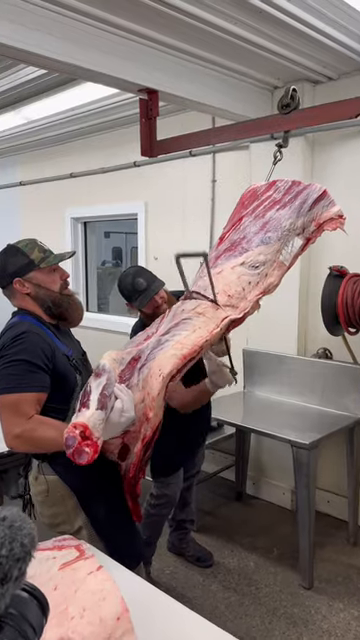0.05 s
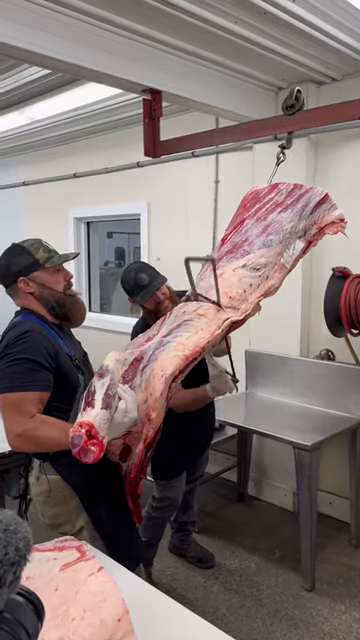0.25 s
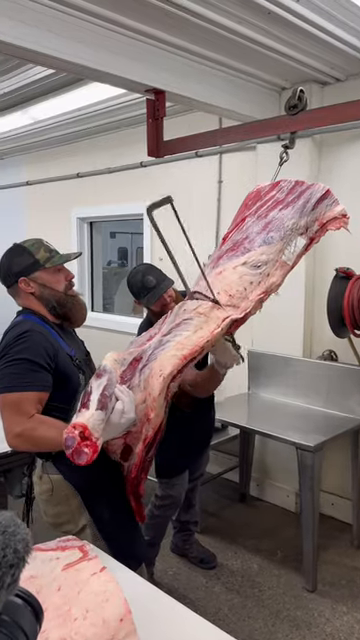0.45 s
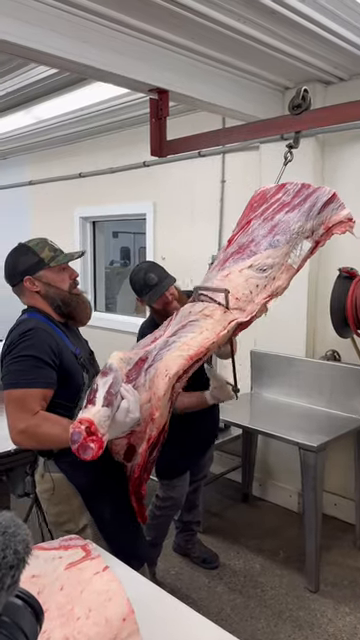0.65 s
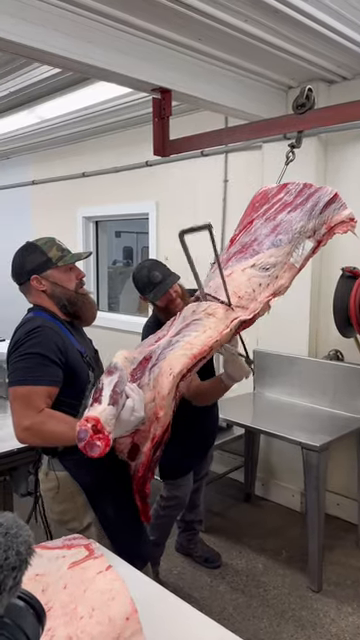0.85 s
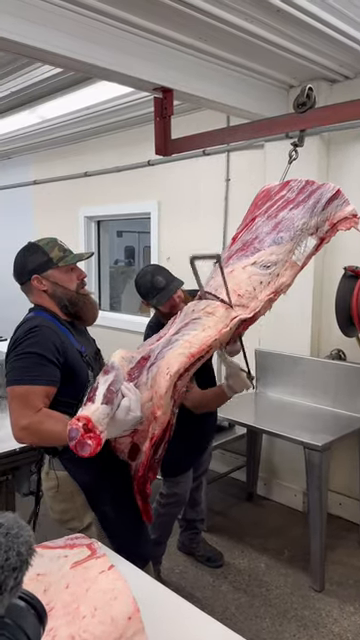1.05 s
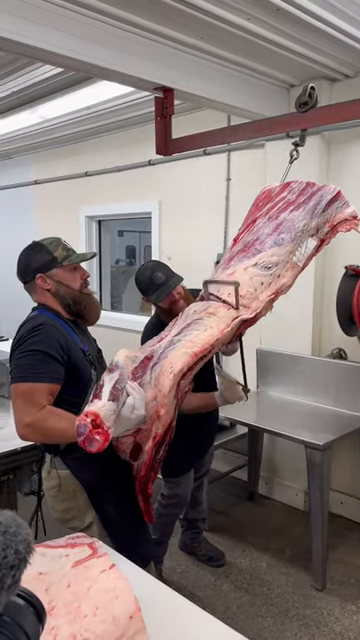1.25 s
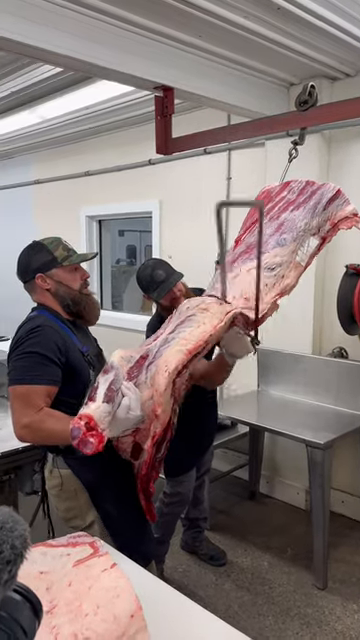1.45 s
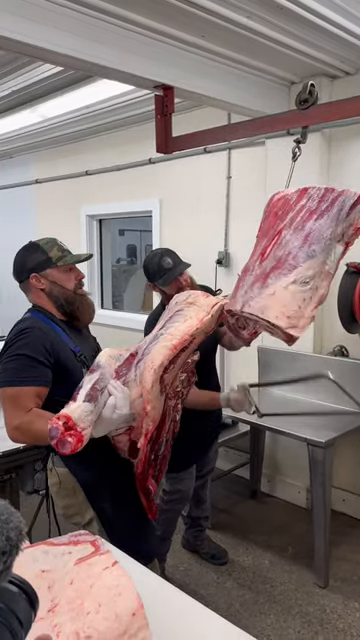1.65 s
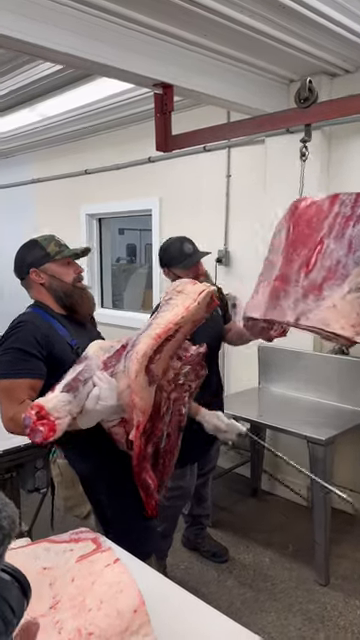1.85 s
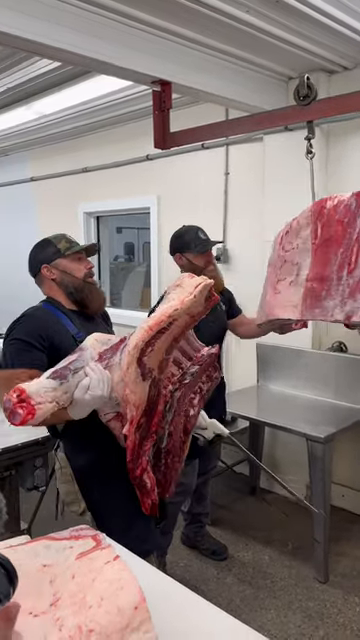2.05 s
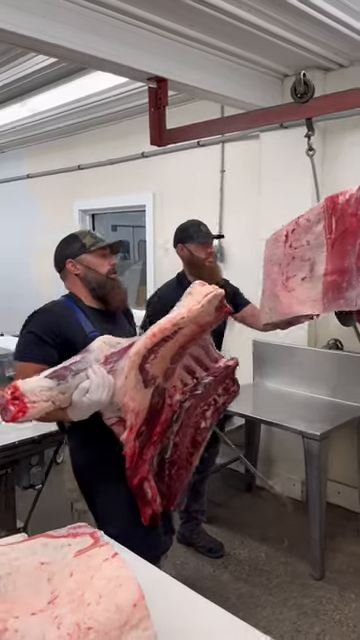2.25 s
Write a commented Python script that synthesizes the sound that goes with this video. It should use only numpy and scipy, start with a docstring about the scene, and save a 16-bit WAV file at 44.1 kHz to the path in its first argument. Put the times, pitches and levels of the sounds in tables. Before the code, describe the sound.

Nearby, a butcher's hand saw makes three loud, gritty cuts through a side of beef, each after a lighter return stroke. A muffled crack and faint thuds follow, while cooling machinery hums in the echoing room.

```python
"""A butcher's hand saw cuts through a hanging side of beef in a hard-walled room; a cooling plant rumbles.
Three times a light return stroke leads into a loud cut: tooth impacts and bone chips excite the steel
frame, stick-slip friction makes the blade squeal, and a hollow resonance falls as the arm slows.
At about 1.5 s the last of the bone snaps, and the halves are carried off with dull knocks."""
import sys
import numpy as np
from scipy import signal
from scipy.fft import rfft, irfft
from scipy.io import wavfile

SR = 44100
rng = np.random.default_rng(int(sys.argv[2]) if len(sys.argv) > 2 else 0)


def transcribe(u):
    """Save the signal u as a 16-bit wav file named by the first command-line argument.

    u: samples, shape (n,) or (channels, n), limited to [-1, 1]; the rate is SR.
    q: integer samples, one column per channel.
    """
    v = np.clip(np.atleast_2d(u).T, -1, 1)
    q = np.round(v * 32767).astype(np.int16)
    wavfile.write(sys.argv[1], SR, q)


N = 101429
FFT_SIZE = 2 ** 17
T, HZ = np.arange(N) / SR, np.fft.rfftfreq(FFT_SIZE, 1 / SR)

# force on the teeth, one curve per stroke (time [s], level [dB])
CUT_FORCES = [
    [(.19, -42.5), (.208, -33.5), (.272, -36.5), (.298, -25.5), (.322, -27.5), (.35, -24), (.378, -25),
     (.41, -35), (.45, -41)],
    [(.7, -49.5), (.735, -35.5), (.78, -32.5), (.825, -26), (.865, -26), (.892, -23.5), (.92, -30),
     (.96, -50)],
    [(1.22, -37.5), (1.25, -30), (1.275, -21.5), (1.315, -24.5), (1.357, -23), (1.378, -32), (1.42, -36)],
]
RETURN_FORCES = [
    [(0, -38), (.045, -41), (.1, -39), (.16, -42.5), (.18, -44)],
    [(.46, -56), (.52, -39), (.6, -37.5), (.66, -39.5), (.7, -46)],
    [(.99, -52), (1.045, -32), (1.075, -35), (1.108, -31), (1.16, -32.5), (1.21, -39)],
]
# timbre of each cut (middle of the note's fall [s], start [Hz], end [Hz], note level [dB],
# treble tilt [dB per 8 kHz], screech boost [dB])
CUT_TIMBRES = [(0.386, 1970, 534, -6.5, -0.5, 5), (0.879, 1590, 670, -7, -1.5, 5),
               (1.314, 1300, 790, -9.5, 0.5, 3.5)]
# spectra of the rasp (frequency [Hz], relative level [dB])
CUT_SPECTRUM = [(80, -33), (220, -4), (500, -7), (1100, -15), (2200, -4), (2650, -3), (3400, -2.5),
                (4300, -2.5), (4800, -4.5), (6200, -1), (7400, 0.5), (8600, -1), (10400, -5.5)]
RETURN_SPECTRUM = [(100, -39), (400, -11), (1200, -10), (2200, -4.5), (3700, 0.5), (4800, -1), (6000, 2),
                   (7300, 0), (8600, -1), (10400, -9.5)]
def saw(cut_drive_db=-10.5, return_drive_db=-18.5, high_hiss_db=-8):
    """Source and filter: tooth clicks, scaled by force, are heard as a rasp and drive the frame."""
    rasp, drive = np.zeros(N), np.zeros(N)
    screech_band = np.exp(-((HZ - 3760) / 850) ** 4)
    for curve, (middle, start_hz, end_hz, note_db, tilt_db, screech_db) in zip(CUT_FORCES, CUT_TIMBRES):
        clicks, force = teeth(curve)
        spectrum = colour(CUT_SPECTRUM) * amp(tilt_db * HZ / 8000 + screech_db * screech_band)
        rasp += filtered(clicks * force, spectrum)
        rasp += amp(note_db) * hollow_note(teeth(curve)[0], middle, start_hz, end_hz) * force
        drive += amp(cut_drive_db) * teeth(curve)[0] * force
    for curve in RETURN_FORCES:
        clicks, force = teeth(curve)
        rasp += filtered(clicks * force, colour(RETURN_SPECTRUM))
        drive += amp(return_drive_db) * clicks * force
    # a faint, narrow hiss near 15 kHz follows the strokes
    faint_high_hiss = filtered(drive, unit(np.exp(-((HZ - 14720) / 580) ** 2)))
    return rasp + frame(drive) + squeals() + rubbing() + amp(high_hiss_db) * faint_high_hiss


def teeth(curve, peak_tooth_hz=752.4, chips_per_s=9000, strike_share=0.1):
    """Impact excitation: teeth strike at a rate proportional to arm speed and break off chips."""
    times, db = np.transpose(curve)
    speed = .25 + .75 * arch(times[0], times[-1] - times[0])
    teeth_passed = np.cumsum(peak_tooth_hz * speed * (1 + .12 * wander(150))) / SR
    strikes = impulses(teeth_passed) * rng.uniform(0.17, 1, N)
    chips = (rng.random(N) < chips_per_s / SR) * rng.choice([-1, 1], N)
    chips = chips * amp(2.5 * np.minimum(rng.exponential(1, N), 3))
    chips *= 0.93 + np.exp(-3 * (teeth_passed % 1))  # strongest just after a strike
    clicks = np.sqrt(strike_share) * unit(strikes - strikes.mean())
    clicks += np.sqrt(1 - strike_share) * unit(chips)
    force = amp(np.interp(T, times, db, left=-150, right=-150))
    return unit(dispersed(clicks) * chatter()), force


def chatter(depth_db=0.66, rate_hz=93):
    """Amplitude modulation: a slight random flutter in level."""
    return amp(depth_db * wander(rate_hz))


def dispersed(clicks, spread_s=.004):
    """Dispersion: the blade delays each frequency differently, smearing a click into a scratch."""
    delay = spread_s * np.interp(HZ, np.linspace(0, SR / 2, 60), rng.random(60))
    return filtered(clicks, np.exp(-2j * np.pi * np.cumsum(delay) * HZ[1]))


def hollow_note(clicks, middle, start_hz, end_hz, fall_s=.014):
    """Swept resonance: a broad peak of the cut slides down as the arm slows."""
    hz, t, spectra = signal.stft(clicks, SR, nperseg=512, noverlap=384)
    fall_left = .5 - .5 * np.tanh((t - middle) / fall_s / 2)
    centre = end_hz * (start_hz / end_hz) ** fall_left
    gain = band(centre, octaves=1, hz=hz[:, None]) / np.sqrt(centre)
    return unit(signal.istft(spectra * gain, SR, nperseg=512, noverlap=384)[1][:N])


# modes of blade and frame (frequency [Hz], relative energy [dB], time to decay by 60 dB [s])
STEEL_MODES = [(534, -5, .14), (792, -2, .16), (892, -2, .18), (1560, -2, .08), (1763, -2, .14),
               (2168, 2, .16), (2574, -1, .1), (3138, 1, .15), (3585, 2, .08), (3946, -3, .1),
               (4100, 1, .05), (4324, -1, .1), (6423, -2, .15), (7220, 3, .1)]
def frame(drive):
    """Modal vibration: every tooth excites the same damped modes of the steel."""
    t = T[:SR // 2]
    ring = sum(amp(db - 60 * t / t60) * np.sin(2 * np.pi * hz * t) / np.sqrt(t60)
               for hz, db, t60 in STEEL_MODES)
    return signal.fftconvolve(drive, ring / np.linalg.norm(ring))[:N]


# squeals of the binding blade (start [s], duration [s], frequency [Hz], level [dB])
BLADE_SQUEALS = [(0.284, 0.044, 2110, -28.5), (0.799, 0.046, 3140, -29), (0.822, 0.044, 4160, -29.5),
                 (0.833, 0.058, 3585, -30.5), (0.854, 0.06, 7210, -25.5), (0.874, 0.036, 544, -32),
                 (1.024, 0.032, 548, -35.5), (1.242, 0.033, 540, -35)]
def squeals(waver_hz=39.9, octave_db=-12):
    """Stick-slip oscillation: short wavering tones with a weak second harmonic."""
    out = np.zeros(N)
    for start, length, hz, db in BLADE_SQUEALS:
        phase = 2 * np.pi * np.cumsum(hz + waver_hz * wander(rate_hz=154.7)) / SR
        swell = amp(db) * arch(start, length) * chatter()
        out += swell * np.sqrt(2) * (np.sin(phase) + amp(octave_db) * np.sin(2 * phase))
    return out


def rubbing(slip_hz=110, groan_db=-36.5, swish_db=-26.5):
    """Friction: uneven slips groan as the second cut stalls; a smooth slide back through meat swishes."""
    slip_count = np.cumsum(slip_hz * (1 + .15 * wander(2 * slip_hz))) / SR
    slips = dispersed(impulses(slip_count))
    groan = unit(filtered(slips, band(454, octaves=0.63)))
    groan *= np.sqrt(abs(arch(start=0.887, length=0.086)))
    swish = noise(band(4300, octaves=0.73)) * arch(start=1.083, length=0.065)
    return amp(groan_db) * groan + amp(swish_db) * swish


# spectrum of the last bone giving way (frequency [Hz], relative level [dB])
SNAP_SPECTRUM = [(120, -9), (560, 2), (1350, -7), (2400, -24)]
# knocks of meat and handling (time [s], level [dB], centre [Hz], width [octaves], decay time [s])
DULL_KNOCKS = [(0.197, -38.5, 272, 0.075, 0.03), (1.627, -46, 226, 1, 0.073),
               (1.794, -43, 193, 0.93, 0.053), (2.004, -47.5, 405, 0.52, 0.019),
               (2.081, -44, 66.6, 0.28, 0.01)]
def carcass(skirt_db=-14):
    """Damped impacts: the bone snaps and heavy meat knocks, too lossy to ring."""
    out = blow(start=1.461, db=-34, decay=0.022, spectrum=colour(SNAP_SPECTRUM))
    for start, db, hz, width, decay in DULL_KNOCKS:
        octaves = np.log2((HZ + 1) / hz)
        upper_skirt = amp(skirt_db) * (octaves > 0) / (1 + octaves ** 2)
        out += blow(start, db, decay, band(hz, width) + upper_skirt)
    return out


def blow(start, db, decay, spectrum, rise_s=0.013):
    """Soft contact: coloured noise rises linearly and decays exponentially."""
    age = np.maximum(T - start, 0)
    envelope = np.minimum(age / rise_s, 1) * np.exp(-np.maximum(age - rise_s, 0) / decay)
    return amp(db) * envelope * noise(spectrum)


def room(sound, paths=3, sway_hz=4):
    """Time-varying reflection: the sound fades between echo paths as saw and carcass sway."""
    weights = [np.cos(np.pi * (sway_hz * T + k / paths)) * np.sqrt(2 / paths) for k in range(paths)]
    return sum(signal.fftconvolve(sound * weight, echoes())[:N] for weight in weights)


# reverberation of the hard-walled room (frequency [Hz], time to decay by 60 dB [s])
REVERB_TIMES = [(150, 1), (600, 0.62), (2000, 0.74), (4500, 0.78), (8000, 0.69), (15000, 0.41)]
def echoes(early_db=-4, early_decay_s=0.0078, tail_db=-6.5):
    """Impulse response of one path: early reflections and a diffuse, exponentially decaying tail."""
    t = T[:SR]
    hz, age, spectra = signal.stft(rng.standard_normal(SR) * (t > .004), SR, nperseg=256)
    decay = amp(-60 * age / read(REVERB_TIMES, hz)[:, None])
    tail = signal.istft(spectra * decay, SR, nperseg=256)[1][:SR]
    early = rng.standard_normal(SR) * np.exp(-t / early_decay_s)
    return amp(tail_db) * tail / np.linalg.norm(tail) + amp(early_db) * early / np.linalg.norm(early)


# spectrum of rumble and moving air (frequency [Hz], relative level [dB])
PLANT_SPECTRUM = [(25, -22), (45, -9), (65, -5.5), (100, -6), (200, -12.5), (380, -14.5), (600, -22),
                  (800, -24), (1700, -32.5), (3500, -33), (5200, -39.5), (10500, -41)]
def cooling_plant(air_db=-46, hum_hz=61.8, hum_db=-49.5):
    """Machine noise: a steady broadband rumble plus a hum that wavers in phase and level."""
    air = noise(colour(PLANT_SPECTRUM))
    hum = np.sqrt(2) * np.sin(2 * np.pi * hum_hz * T + wander(3)) * amp(2.5 * wander(8))
    return amp(air_db) * air + amp(hum_db) * hum


def amp(db):
    """Decibels to amplitude ratio."""
    return 10 ** (np.asarray(db) / 20)


def unit(x):
    """Normalisation to rms 1."""
    return x / np.sqrt(np.mean(x ** 2) + 1e-20)


def read(points, hz=HZ):
    """Interpolation on a log-frequency axis."""
    frequencies, values = np.transpose(points)
    return np.interp(np.log(hz + 1), np.log(frequencies + 1), values)


def filtered(x, gain):
    """Linear filtering: one gain per frequency."""
    return irfft(rfft(x, FFT_SIZE) * gain)[..., :N]


def colour(points):
    """Frequency response of unit power, low-passed above the last point."""
    return unit(amp(read(points)) / np.sqrt(1 + (HZ / points[-1][0] / 1.1) ** 36))


def band(centre, octaves, hz=HZ):
    """Broad resonance: a Gaussian in log frequency."""
    return np.exp(-(np.log2((hz + 1) / centre) / octaves) ** 2)


def noise(spectrum):
    """Filtered Gaussian noise of rms 1."""
    return unit(filtered(rng.standard_normal(N), spectrum))


def wander(rate_hz):
    """Smooth random fluctuation: low-passed noise."""
    return noise(np.exp(-(HZ / rate_hz) ** 2))


def arch(start, length):
    """Half-sine envelope."""
    return np.sin(np.pi * np.clip((T - start) / length, 0, 1))


def impulses(cycles):
    """Pulse train: one impulse per completed cycle."""
    return np.diff(np.floor(cycles), prepend=0)


# likeness of the two channels (frequency [Hz], coherence [ratio])
COHERENCE = [(420, .98), (850, .6), (1600, .93), (2200, .77), (2800, .3), (4100, .68), (4800, .2),
             (5400, .74), (10000, .7)]
# phase lead of the left channel (frequency [Hz], phase [rad])
LEFT_LEAD = [(450, 0), (780, .9), (1100, -.2), (2150, 0), (2700, .9), (3050, -1.1), (4100, 0), (5500, -.1),
             (7500, -.6), (10800, -2.3)]
# left minus right (frequency [Hz], level [dB])
LEFT_BALANCE = [(300, -2), (600, -6), (1200, -1.9), (3500, -1), (8000, -0.4)]
def scene(bass_hz=130):
    """Partial coherence: two close microphones hear one part of the sound alike, one in antiphase."""
    sources = [saw() + carcass() for _ in range(2)]
    shared, apart = [sound + room(sound) + cooling_plant() for sound in sources]
    coherence = np.clip(read([(bass_hz, 1)] + COHERENCE), 0, .999)
    mid = filtered(shared, np.sqrt((1 + coherence) / 2))
    side = filtered(apart, np.sqrt((1 - coherence) / 2))
    balance_db = read([(bass_hz, 0)] + LEFT_BALANCE)
    lead = read([(2 * bass_hz, 0)] + LEFT_LEAD)
    left_gain = amp(balance_db / 2) * np.exp(.5j * lead)
    return np.array([filtered(mid + side, left_gain), filtered(mid - side, 1 / left_gain)])


# notch in the top octave (frequency [Hz], gain [dB])
TREBLE_NOTCH = [(10600, -2), (11500, -47), (13800, -28), (15200, 5)]
def record(dry, cutoff_hz=16000):
    """Band limiting: a notch in the top octave, then a steep low-pass."""
    notched = filtered(dry, amp(read(TREBLE_NOTCH)))
    low_pass = signal.firwin(511, cutoff_hz, window=("kaiser", 9), fs=SR)
    return signal.oaconvolve(notched, low_pass[None], "same")


dry = scene()
out = record(dry)
transcribe(out)
```